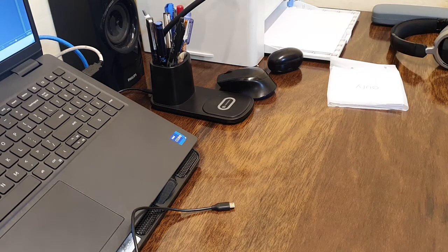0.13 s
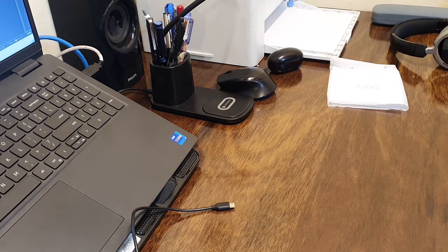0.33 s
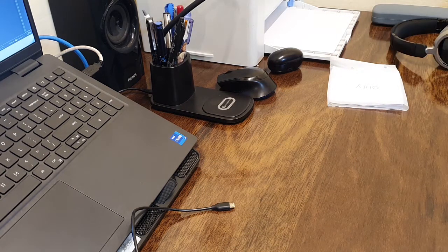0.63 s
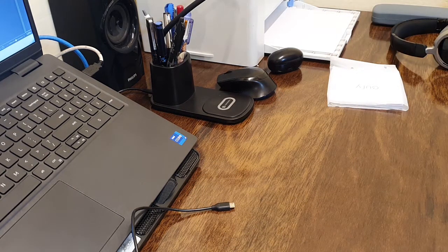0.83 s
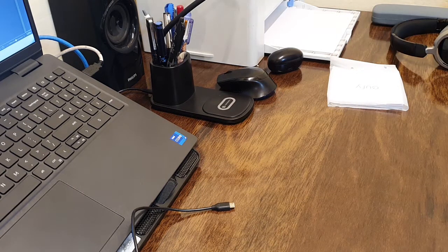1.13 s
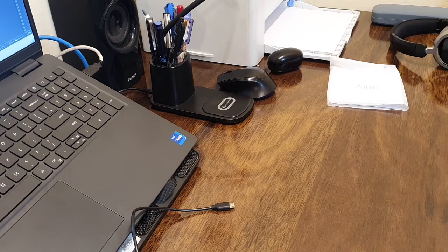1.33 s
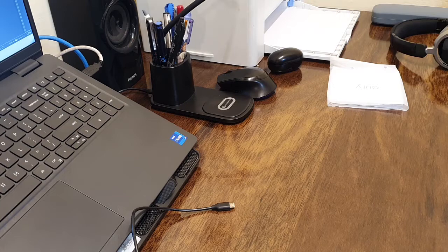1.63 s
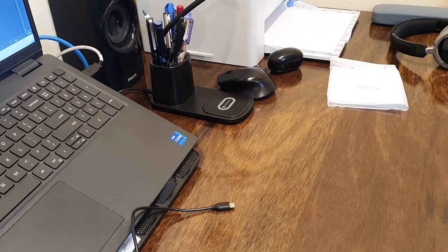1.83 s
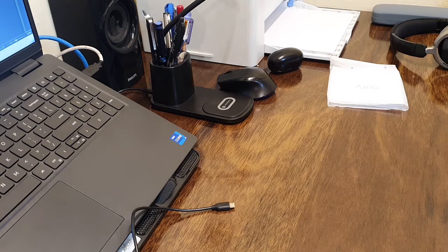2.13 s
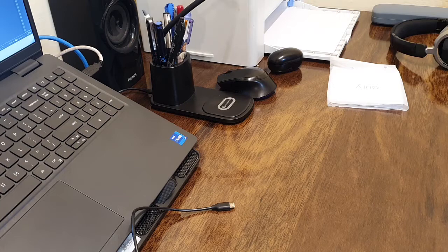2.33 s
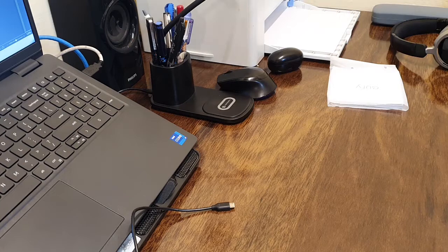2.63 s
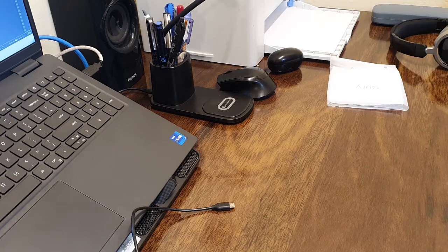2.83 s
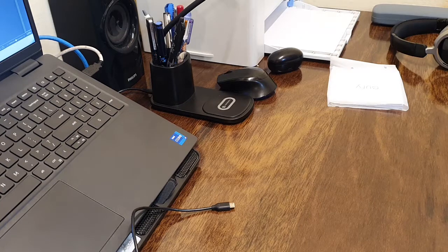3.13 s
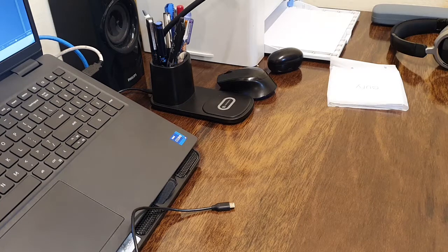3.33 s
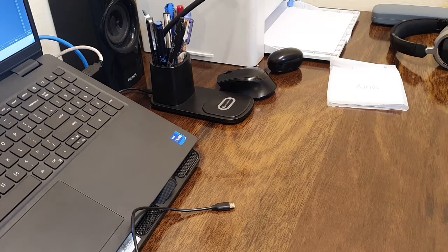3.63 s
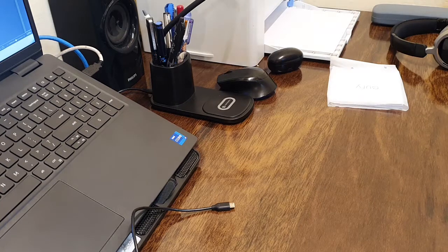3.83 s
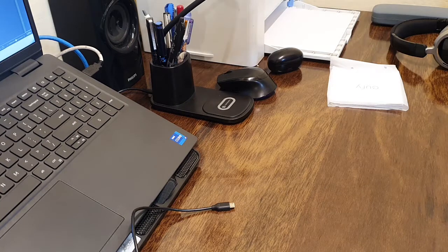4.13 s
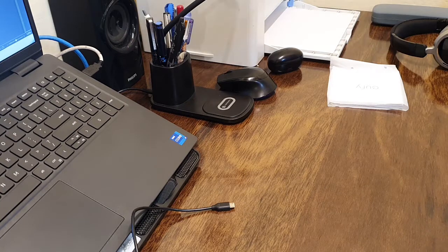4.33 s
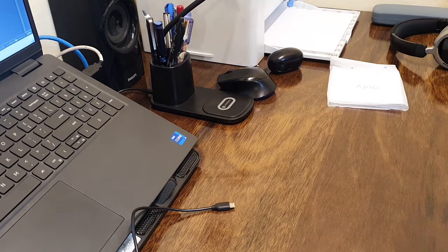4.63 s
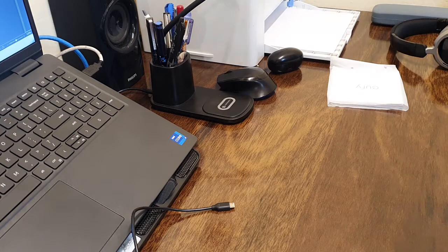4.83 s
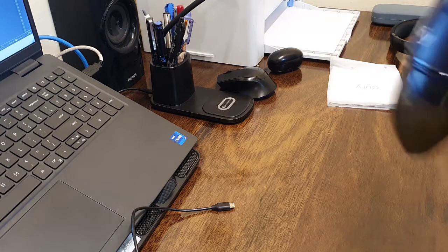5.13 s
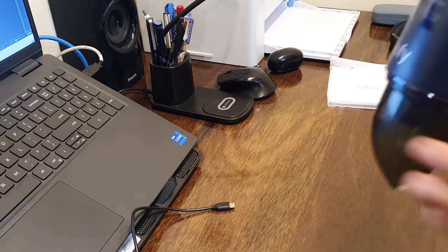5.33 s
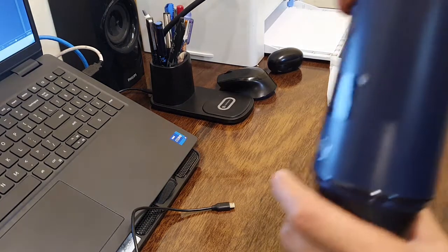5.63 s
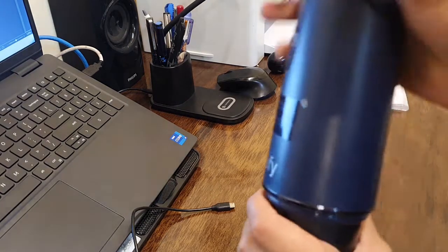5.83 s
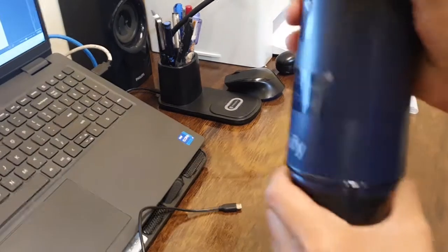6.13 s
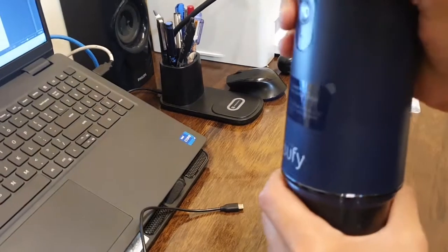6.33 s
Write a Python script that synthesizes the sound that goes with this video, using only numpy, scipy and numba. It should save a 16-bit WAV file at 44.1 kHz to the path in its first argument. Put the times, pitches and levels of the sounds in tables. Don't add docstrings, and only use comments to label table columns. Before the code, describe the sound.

In a quiet indoor room, a small motor coasts to a stop with descending whine and thinning air noise. A faint click follows, then crisp plastic crinkling, clusters of hard latch clicks, a rattly snap with a dull thump, and a brighter burst of rubbing. A final strong snap and faint touches end it. Everything is near the stereo microphone, with a short room tail.

```python
import sys
import numpy as np
from scipy import signal
from scipy.fft import rfft, irfft
from scipy.io import wavfile
from scipy.ndimage import uniform_filter1d, map_coordinates
from numba import njit

SR = 44100
rng = np.random.default_rng(int(sys.argv[2]) if len(sys.argv) > 2 else 0)


def bounce(signal):
    frames = np.transpose(np.atleast_2d(signal))
    limited = np.clip(frames, -1, 1)
    pcm = np.round(limited * 32767).astype(np.int16)
    wavfile.write(sys.argv[1], SR, pcm)


def voltage_ratio(level):
    return 10 ** (np.asarray(level, float) / 20)


N = 285768
TIME = np.arange(N) / SR
OPPOSITE = np.array([[1], [-1]])


def curve(table, column=1, at=TIME, outside=-140.):
    rows = np.array(table, float)
    return np.interp(at, rows[:, 0], rows[:, column], outside, outside)


def unit(x):
    return x / np.sqrt(np.mean(x ** 2))


def colour(x, shape, lo_hz=20, hi_hz=20000):
    hz = np.arange(N // 2 + 1) * SR / N + 1
    rows = np.array(shape, float)
    edges = 1 / np.sqrt((1 + (lo_hz / hz) ** 16) * (1 + (hz / hi_hz) ** 16))
    gain = voltage_ratio(np.interp(np.log(hz), np.log(rows[:, 0]), rows[:, 1]))
    return irfft(rfft(x) * edges * gain, N)


@njit
def svf(x, hz, width):
    y, band, low = np.empty(len(x)), 0., 0.
    for i in range(len(x)):
        g = np.tan(np.pi * hz[i] / SR)
        damping = width[i] / hz[i]
        v = (band + g * (x[i] - low)) / (1 + g * (g + damping))
        band = 2 * v - band
        low = low + 2 * g * v
        y[i] = damping * v
    return y


def walk(rate, count=N):
    hold = int(SR / rate)
    steps = np.repeat(rng.standard_normal(count // hold + 1), hold)
    return 1.78 * uniform_filter1d(uniform_filter1d(steps, hold), hold)[:count]


def ringing(modes):
    total = np.zeros(N)
    for hz, width_hz, db in modes:
        mode = svf(rng.standard_normal(N), np.full(N, float(hz)), np.full(N, float(width_hz)))
        total += voltage_ratio(db) * unit(mode)
    return unit(total)


def place(x, lag, pan_db, room_db):
    room_t60_s = 0.25
    late = map_coordinates(x, [np.arange(N) - lag], order=3)
    t = TIME[:SR // 2]
    decay = (voltage_ratio(-60 * t / room_t60_s) + np.exp(-t / .012)) * np.clip(t / .002, 0, 1)
    both, own = rng.standard_normal((2, len(t))) * decay
    own = signal.lfilter(*signal.butter(1, 700, "high", fs=SR), own)
    tail = (both + own * OPPOSITE) / np.sqrt(2 * np.sum(both ** 2))
    wet = signal.fftconvolve(x[None], tail, axes=1)[:, :N]
    direct = np.array([late * voltage_ratio(pan_db / 2), x * voltage_ratio(-pan_db / 2)])
    return direct + voltage_ratio(room_db) * wet


def room_tone():
    # frequency in Hz, level in dB per Hz.
    air = [(18, -38.5), (30, -23), (59, -1), (81, -6), (210, -6), (259, -17), (303, -2), (364, -21),
           (844, -18.5), (1130, -23), (1250, -20.5), (3580, -30.5), (5040, -7.5), (7270, -34), (16000, -44)]
    air_db = -72
    mid = colour(rng.standard_normal(N), air, 36)
    side = colour(rng.standard_normal(N), air, 36)
    side = colour(side, [(30, -5.5), (300, -4.5), (700, -1), (1400, -0.5), (16000, 3)])
    return voltage_ratio(air_db + .8 * walk(3.4)) * (mid + side * OPPOSITE) / np.std(mid)


def motor():
    # time in s, shaft speed in turns per second (Hz).
    speed = [(0.0, 314.1), (0.1, 293.2), (0.2, 273.8), (0.3, 255.7), (0.4, 238.7), (0.5, 222.7),
             (0.6, 207.6), (0.7, 193.1), (0.8, 179.2), (0.9, 166.0), (1.0, 153.4), (1.1, 141.4),
             (1.2, 129.9), (1.3, 118.8), (1.4, 107.9), (1.5, 97.4), (1.6, 87.2), (1.7, 77.5), (1.8, 68.6),
             (1.9, 60.5), (2.0, 53.4), (2.1, 47.1), (2.2, 41.7), (2.3, 37.0)]
    # time in s, noise in dB, top hiss minus housing in dB,
    # left minus right in dB, lower air noise minus housing in dB.
    coast = [(0.0, -42, -8, 3, 6.5), (0.1, -44, -10.5, 3.5, 2), (0.4, -43, -9.5, 0.5, -5.5),
             (0.57, -48, -6.5, 2, 0.5), (0.64, -48, -7, -1.5, -3.5), (0.72, -51, -3.5, -1.5, -6),
             (0.99, -50, -9.5, 0.5, -3.5), (1.06, -53, -4, -2, -7), (1.12, -51.5, -6.5, 4, -8.5),
             (1.15, -54.5, -5, 3, -4.5), (1.22, -52, -7.5, 3.5, -8.5), (1.26, -54, -6, 5.5, -8.5),
             (1.5, -58.5, -7, 0.5, -6), (1.69, -57.5, -11.5, -1.5, -14.5), (1.87, -62.5, -12, 7, -11),
             (2.07, -65, -18.5, 4, -15), (2.4, -80, 0, 10, -5), (2.55, -109, -29, 12, -13)]
    # frequency in Hz, level in dB per Hz.
    housing = [(180, -51), (300, -10), (511, -11.5), (645, -3.5), (1030, -4.5), (1750, -7.5), (1900, -10),
               (2570, -12.5), (3580, -14), (4440, -11), (4990, -19), (6960, -20.5), (7950, -21),
               (10600, -7.5), (16000, -18.5)]
    beat_db = [-17, -7, -12, -11, -12, -15, -11, -9, -10, -8, -16, -12, -12, -13, -14, -13, -16, -18, -19,
               -16, -17, -19]
    # shaft speed in Hz, level in dB.
    unbalance = [(60, -83), (126, -77.5), (163, -67), (205, -48), (250, -37), (285, -42), (320, -38.5)]
    # time in s, level in dB.
    swirl_db = [(0, -37.5), (.4, -43), (.8, -52), (1.2, -57.5), (1.6, -67.5), (2.0, -90.5), (2.4, -100)]
    # time in s, level in dB.
    panel_db = [(1.0, -61), (1.066, -74), (1.098, -54), (1.146, -46), (1.254, -70), (1.276, -64),
                (1.436, -83), (1.56, -98), (1.574, -90), (1.668, -76), (1.722, -79), (1.784, -54),
                (1.82, -56.5), (1.9, -75), (1.988, -68), (2.046, -60), (2.108, -69), (2.256, -72.5),
                (2.6, -99)]
    other_orders_db, panel_hz, lag = -18, 842, 13.84

    hz = uniform_filter1d(curve(speed, outside=None), SR // 40)
    turn = 2 * np.pi * np.cumsum(hz) / SR
    span = int(coast[-1][0] * SR)
    beats = {3 * k + 6: db for k, db in enumerate(beat_db)}
    orders = np.zeros(N)
    for k in range(4, 70):
        order_hz = k * hz[:span]
        db = beats.get(k, other_orders_db - 80 / k + 2.5 * rng.standard_normal())
        db = db + 4 * walk(13, count=span)
        db = db - 3 * np.clip(order_hz / 4000 - 1.5, 0, 1) - 9 * np.clip(4 - order_hz / 300, 0, 1)
        tone = np.sin(k * turn[:span] + 2 * np.pi * rng.random())
        orders[:span] += voltage_ratio(db) * (order_hz < SR / 2.5) * tone
    drive = rng.standard_normal(N) + 1.05 * orders * (hz / 300) ** .5

    body_db = curve(coast)
    low = unit(colour(drive, housing, 230, 2900)) * voltage_ratio(body_db + curve(coast, column=4))
    mid = unit(colour(drive, housing, 3580, 6700)) * voltage_ratio(body_db)
    top = unit(colour(drive, housing, 6900, 14700)) * voltage_ratio(body_db + curve(coast, column=2))

    swirl = svf(rng.standard_normal(N), 2.817 * hz, 0.49 * hz)
    swirl = svf(swirl, 2.714 * hz, 1.95 * hz) / np.sqrt(hz / SR)
    swirl = voltage_ratio(curve(swirl_db)) * (swirl + .5 * np.sin(3 * turn))
    panel_phase = 2 * np.pi * np.cumsum(panel_hz + 2.1 * walk(15)) / SR
    panel = np.sqrt(2) * voltage_ratio(curve(panel_db)) * np.sin(panel_phase)

    shaft_db = np.interp(hz, *np.array(unbalance, float).T) + 1.0 * walk(28)
    shaft = np.sqrt(2) * voltage_ratio(shaft_db) * np.sin(turn) * (TIME < speed[-1][0])
    pan_db = curve(coast, column=3, outside=0)
    return place(low + mid + top + swirl + panel, lag, pan_db, 3) + place(shaft, lag, -6.5, -4)


def desk():
    # frequency in Hz, width in Hz, level in dB.
    modes = [(45, 16, -1), (62, 16, 0), (112, 25, -7), (200, 80, -18)]
    # time in s, level in dB.
    rumble = [(0.0, -65.5), (0.066, -65), (0.184, -55), (0.288, -66), (0.454, -60), (0.794, -70.5),
              (1.182, -78), (1.49, -74), (1.7, -94)]
    # time in s, level in dB.
    pushes = [
        [(4.5, -95), (4.538, -43), (4.554, -45.5), (4.634, -52), (4.706, -62.5), (4.718, -65), (4.858, -74),
         (4.9, -83)],
        [(5.52, -85), (5.562, -60.5), (5.65, -55.5), (5.72, -75), (5.736, -70), (5.76, -76)],
        [(5.83, -69), (5.888, -51.5), (5.93, -57.5), (5.964, -64), (5.99, -60), (6.07, -70)],
        [(6.08, -68), (6.102, -53), (6.286, -61.5), (6.328, -71), (6.338, -90), (6.36, -79)],
        [(6.42, -81), (6.432, -84), (6.458, -60.5), (6.48, -63)],
    ]
    shake, other = ringing(modes), ringing(modes)
    shake = shake / np.sqrt(uniform_filter1d(shake ** 2, SR // 30) + .05)
    level = sum(voltage_ratio(curve(part)) for part in pushes + [rumble])
    return (shake * voltage_ratio(-.5 * OPPOSITE) + .15 * other * OPPOSITE) * level


def clicks():
    # time in s, level in dB, main ring in Hz, second ring in Hz,
    # rattle in dB, left minus right in dB.
    latches = [(2.609, -50.5, 3060, 2245, -20, -1), (3.756, -36, 2840, 1660, -28, 8),
               (3.802, -39, 2900, 1640, -28, -3), (3.824, -40.5, 2900, 1860, -22, 9),
               (3.871, -30.5, 2980, 1830, -29, 1), (4.116, -44, 5500, 760, -24, 5),
               (4.211, -28.5, 3670, 1850, -26, -1.5), (4.71, -26.5, 3480, 1140, -12.5, 6),
               (4.824, -43, 4600, 2190, -25, 10), (5.639, -53, 2480, 821, -22, 28),
               (6.099, -22.5, 2315, 1630, -20, 3), (6.243, -35, 2083, 1250, -37, 14.5),
               (6.348, -61.5, 4790, 1845, -28, 17)]
    # share of main ring, share of second ring (both ratios), level in dB.
    shell = np.array([[1, 0, -1.5], [1.5, 0.024, -10], [.76, 0, -8.5],
                      [3.6, 0.068, -16], [0, 1.1, -17], [3.9, 2.8, -70]])
    ring_t60_s, rattle_t60_s = .013, .2
    out, t = np.zeros((2, N + SR)), TIME[:SR // 4]
    for s, db, main_hz, second_hz, rattle_db, pan_db in latches:
        crack_noise, rattle_noise = rng.standard_normal((2, len(t)))
        hz = shell[:, :1] * main_hz + shell[:, 1:2] * second_hz
        ring = np.sum(voltage_ratio(shell[:, 2:]) * np.sin(2 * np.pi * hz * t), axis=0) * voltage_ratio(-60 * t / ring_t60_s)
        crack = .9 * crack_noise * np.exp(-t / .0005)
        band = signal.butter(1, [.6 * second_hz, 0.63 * main_hz], "band", fs=SR)
        rattle = voltage_ratio(rattle_db - 60 * t / rattle_t60_s) * signal.lfilter(*band, rattle_noise)
        hit = voltage_ratio(db - 1) * (ring + crack + rattle)
        start = int(s * SR)
        out[:, start:start + len(t)] += hit * voltage_ratio(np.clip(pan_db * OPPOSITE, -8, 8) / 2)
    return out[:, :N]


def hands():
    # time in s, then top, presence, body
    # and hollow levels in dB.
    movements = [
        [(2.88, -107, -96, -101, -91.5), (2.934, -75.5, -83.5, -90, -105), (3.092, -50, -59.5, -87, -103),
         (3.144, -52, -57.5, -78.5, -85), (3.262, -59.5, -64, -88, -99), (3.306, -59.5, -66.5, -98, -84),
         (3.566, -82.5, -87, -101, -105), (3.636, -73, -73, -100, -91), (3.684, -59, -62, -83, -97),
         (3.696, -52, -53.5, -70, -81), (3.744, -46.5, -52, -69, -62), (3.758, -46.5, -46, -48, -71),
         (3.798, -41.5, -45, -57, -75), (3.882, -48, -49.5, -55, -65), (3.974, -74.5, -68.5, -93, -69),
         (4.07, -57.5, -65.5, -89, -93), (4.092, -70.5, -74, -71, -75), (4.2, -74.5, -72, -81, -88)],
        [(4.22, -59.5, -49, -61, -76), (4.312, -76, -79.5, -76, -89), (4.356, -70, -72, -75, -75),
         (4.486, -49.5, -55.5, -72, -78), (4.5, -45.5, -51, -62, -89), (4.538, -51, -56, -71.5, -62),
         (4.682, -63, -68, -73, -77), (4.695, -75, -60, -66, -76)],
        [(4.72, -63.5, -58.5, -62.5, -77), (4.954, -61, -67, -72, -86), (5.014, -41, -49, -69, -64),
         (5.034, -46, -46.5, -47, -62), (5.064, -28.5, -35.5, -50.5, -53), (5.106, -48, -58, -62.5, -73),
         (5.132, -36, -40, -51.5, -66), (5.156, -37.5, -46.5, -53, -46.5), (5.208, -54.5, -47.5, -58.5, -56),
         (5.242, -38, -42, -57.5, -56.5), (5.386, -54.5, -56, -66, -69), (5.464, -76, -76, -87, -94),
         (5.62, -76.5, -86, -101, -61)],
        [(5.7, -108, -84, -91, -82), (5.732, -87, -88, -87, -88), (5.774, -70, -69, -81, -86),
         (5.786, -66.5, -65.5, -80, -81), (5.878, -70, -70, -80, -75), (5.982, -95, -97, -102, -85.5),
         (6.07, -96, -86, -84, -75.5)],
        [(6.106, -53.5, -40, -45, -45.5), (6.114, -60, -55, -57, -53), (6.224, -61.5, -72.5, -72, -80),
         (6.232, -75, -74, -69.5, -72)],
        [(6.255, -70.5, -73, -64, -66), (6.307, -82.5, -79.5, -78, -81.5), (6.331, -91.5, -88, -80, -77),
         (6.353, -87, -87, -77, -83), (6.4, -105, -91, -93, -90.5)],
    ]
    # frequency in Hz, level in dB per Hz.
    skin = [(110, -46), (180, -2), (267, -6), (310, 7), (599, -16), (1240, -24), (1620, -17), (2270, -21.5),
            (2900, -11), (4550, -8), (6750, -6.5), (7550, -13.5), (9820, 2), (13300, 5), (16000, 0.5)]
    # time in s, share from 0 to 1.
    crackle_share = [(2.9, .8), (3.6, .8), (3.75, .65), (3.95, .6), (4.05, .8), (4.45, .35), (4.9, .5),
                     (5.02, .12), (5.35, .15), (5.45, .6), (5.8, .2)]
    slip_db = 4.5 * np.minimum(rng.exponential(size=N), 3)
    slips = (rng.random(N) < 500 / SR) * voltage_ratio(slip_db)
    smear = signal.lfilter([1], [1, -.93], slips) * rng.standard_normal(N)
    share = curve(crackle_share, outside=None)
    hiss = rng.standard_normal(N) * voltage_ratio(0.79 * walk(60))
    rub = np.sqrt(1 - share) * hiss + np.sqrt(share) * unit(smear)
    out = np.zeros(N)
    bands_hz = [(7500, 16500), (2500, 7500), (1200, 2500), (180, 600)]
    for column, band in enumerate(bands_hz, 1):
        gain = sum(voltage_ratio(curve(part, column=column)) for part in movements)
        out += unit(colour(rub, skin, *band)) * gain
    return out


def crackles():
    # time in s, level in dB, duller part
    # in dB.
    crinkle = [(2.9143, -72, -2), (2.9386, -44.5, -27), (2.9587, -53, -14.5), (2.9816, -45, -26),
               (2.9881, -44.5, -20), (3.032, -50, -18.5), (3.0575, -35.5, -26), (3.0995, -36.5, -14),
               (3.1882, -35.5, -6), (3.2234, -37.5, -20), (3.2677, -46.5, -20), (3.2675, -35.5, -22),
               (3.3052, -38.5, -19), (3.3142, -50, -11), (3.3164, -35.5, -24), (3.3477, -44, -21),
               (3.3868, -48, -14), (3.3882, -37.5, -18), (3.4444, -57, -19), (3.5325, -73, -3),
               (3.5364, -43, -28), (3.5763, -64.5, -6), (3.6028, -52, -14), (3.6262, -57, -8),
               (3.6355, -47, -15), (3.6404, -54, -12), (3.6716, -57, -12), (3.6713, -40.5, -23),
               (3.6934, -47.5, -13), (3.6932, -30, -11),
               (3.7034, -36.5, -14), (3.7624, -33.5, 1), (3.8544, -33.5, -10), (3.9085, -33.5, -22),
             (3.9806, -42, -5.5), (4.0107, -40.5, -8), (4.0463, -41.5, -5.5), (4.0622, -34.5, -18),
             (4.0732, -44.5, -18), (4.0994, -60.5, -6), (4.3793, -55.5, -17.5), (4.4038, -37.5, -24),
             (4.4466, -37, -13), (4.4902, -26.5, -9), (4.8784, -44.5, -14), (4.899, -42.5, -1.5),
             (4.9691, -45.5, -6), (5.009, -25.5, -14.5), (5.3977, -32.5, -22), (5.4505, -48.5, -18),
             (5.4799, -42.5, -21), (5.5378, -58.5, -11), (5.5788, -42, -27), (5.6386, -55, 1),
             (6.2078, -43.5, -22), (6.215, -42, -14)]
    out, t = np.zeros(N + SR), TIME[:2000]
    bright = signal.butter(4, 8300, "high", fs=SR, output="sos")
    dull = signal.butter(2, [2800, 7000], "band", fs=SR, output="sos")
    for s, db, dull_db in crinkle:
        burst = rng.standard_normal(len(t)) * (np.exp(-t / 0.0002) + 0.069 * np.exp(-t / 0.004))
        dull_part = 1.13 * voltage_ratio(min(dull_db, 0)) * signal.sosfilt(dull, burst)
        snap = signal.sosfilt(bright, burst) + dull_part
        start = int(s * SR)
        out[start:start + len(t)] += voltage_ratio(db + 9.5) * snap / np.abs(burst).max()
    return out[:N]


def scrapes():
    # frequency in Hz, width in Hz, level in dB.
    cup = [(676, 120, -4), (874, 130, -2.5), (1005, 69, -3.5)]
    # time in s, level in dB.
    drags = [
        [(4.04, -95), (4.05, -101), (4.092, -63.5), (4.19, -84)],
        [(4.75, -87), (4.79, -70.5), (4.954, -94), (5.068, -64), (5.098, -71.5), (5.258, -62), (5.282, -79),
         (5.34, -69), (5.4, -75)],
        [(5.75, -75), (5.764, -104), (5.788, -61), (5.798, -57), (6.0, -98)],
        [(6.106, -45), (6.118, -55.5), (6.226, -71), (6.232, -71)],
    ]
    return ringing(cup) * voltage_ratio(1.2 * walk(83)) * sum(voltage_ratio(curve(part)) for part in drags)


def scene():
    # time in s, left port delay in samples, left minus right in dB.
    hands_lag = [(2.9, 12, -8), (3.7, 12, -4.5), (4.2, 13, 2.5), (4.8, 8.66, 3.5), (5.2, 4.43, 5),
                 (5.7, 2.53, 9.5), (6.5, 1.8, 8.5)]
    lag = curve(hands_lag, outside=None)
    pan_db = curve(hands_lag, column=2, outside=None)
    hits = clicks()
    difference = (hits - hits[::-1]) / 2
    hits = place(hits.mean(axis=0), lag, 0, -7) + difference
    handling = place(hands() + scrapes(), lag, pan_db, 0) + place(crackles(), lag, pan_db, -5)
    return room_tone() + motor() + desk() + hits + handling


def low_pass(x):
    return signal.sosfilt(signal.butter(12, 16410, fs=SR, output="sos"), x)


def record(dry):
    return low_pass(dry)


dry = scene()
out = record(dry)
bounce(out)
```